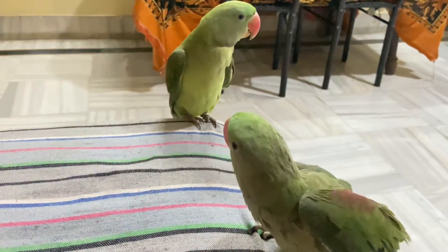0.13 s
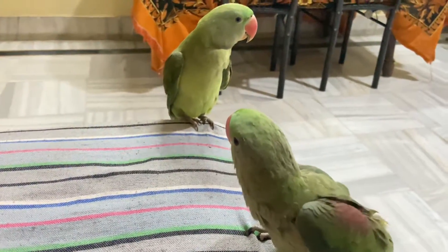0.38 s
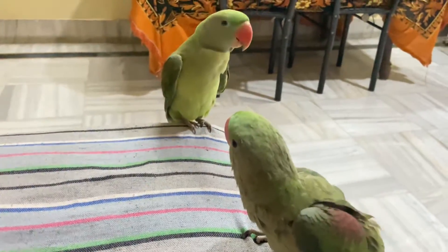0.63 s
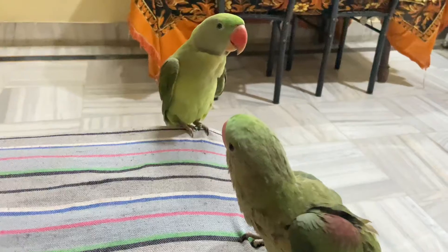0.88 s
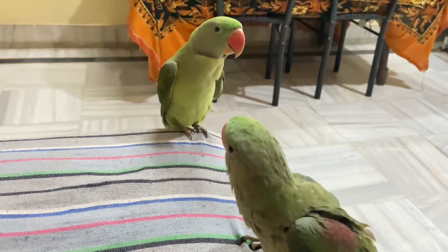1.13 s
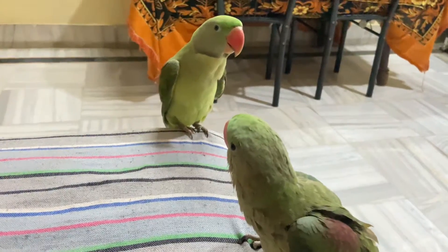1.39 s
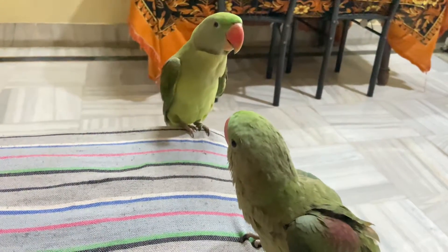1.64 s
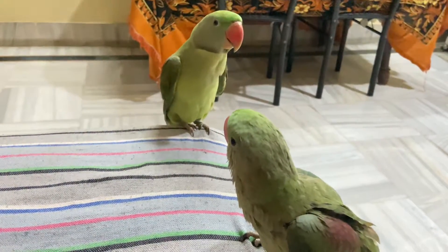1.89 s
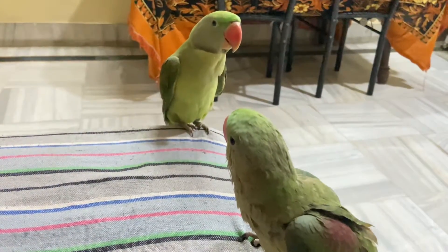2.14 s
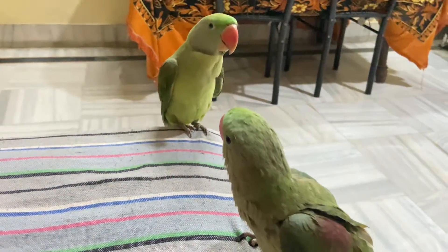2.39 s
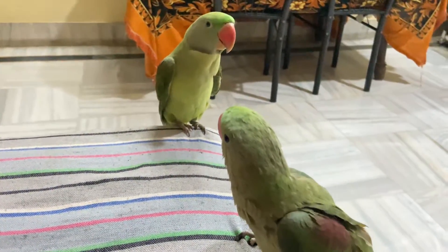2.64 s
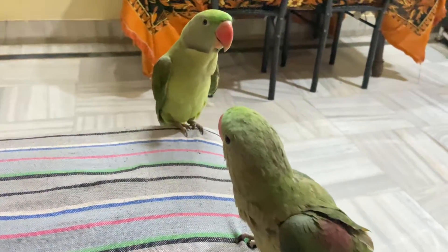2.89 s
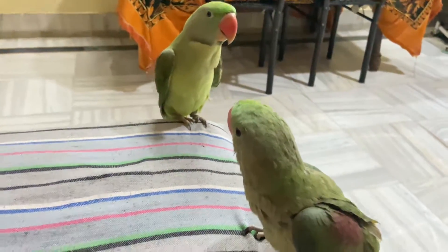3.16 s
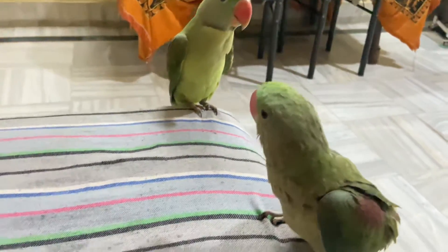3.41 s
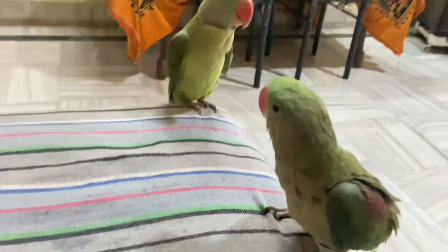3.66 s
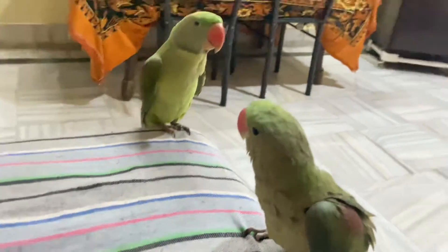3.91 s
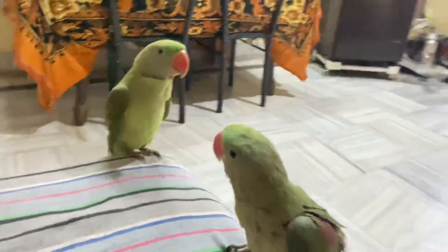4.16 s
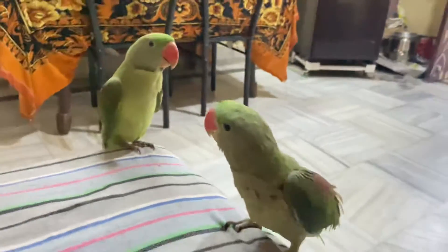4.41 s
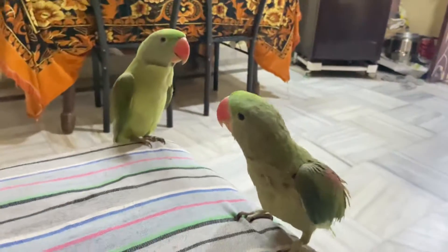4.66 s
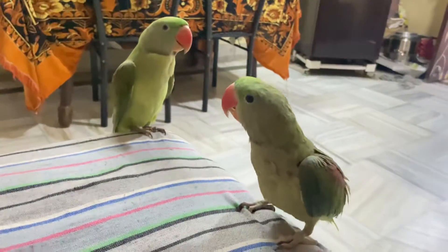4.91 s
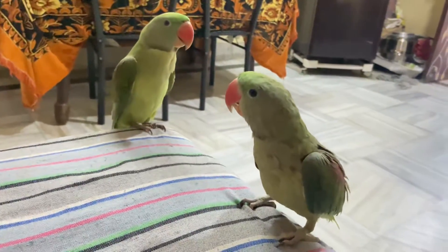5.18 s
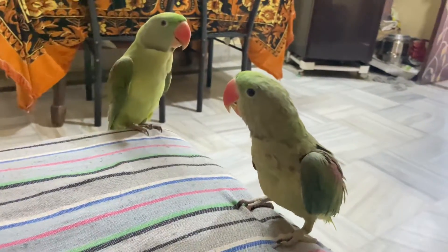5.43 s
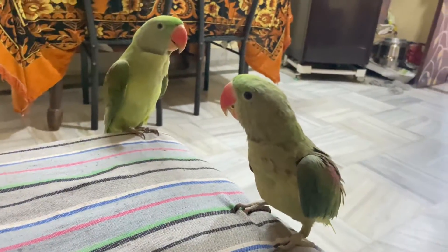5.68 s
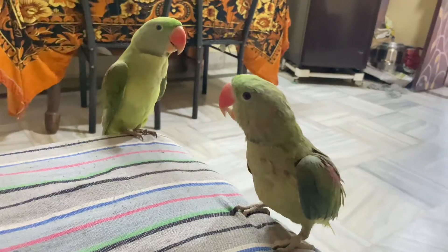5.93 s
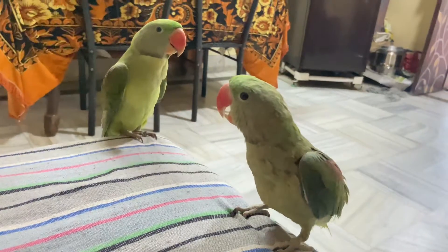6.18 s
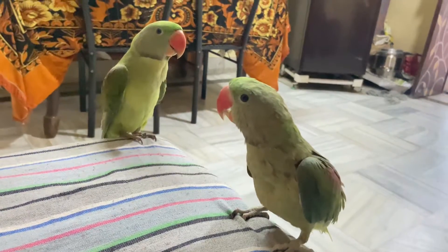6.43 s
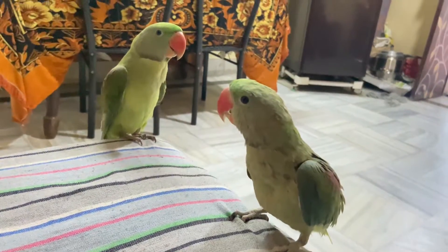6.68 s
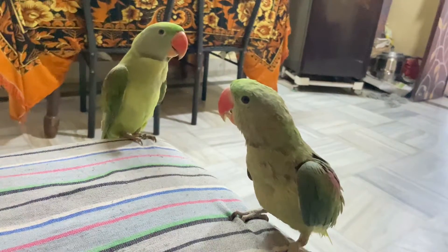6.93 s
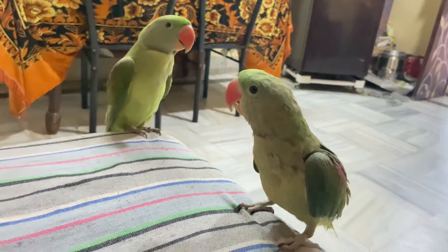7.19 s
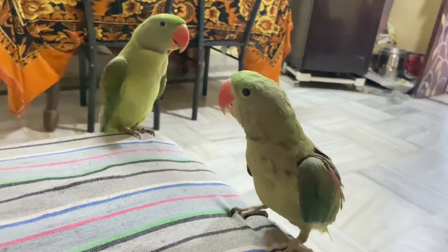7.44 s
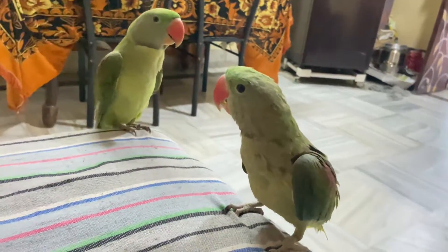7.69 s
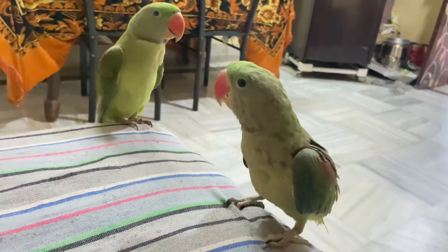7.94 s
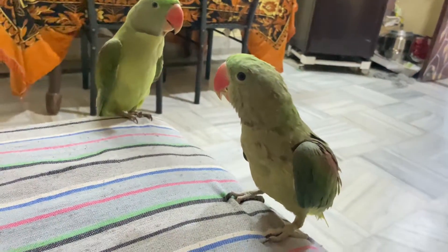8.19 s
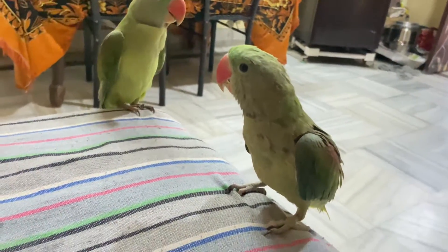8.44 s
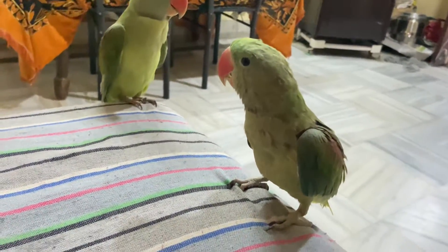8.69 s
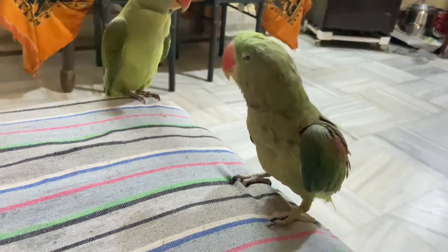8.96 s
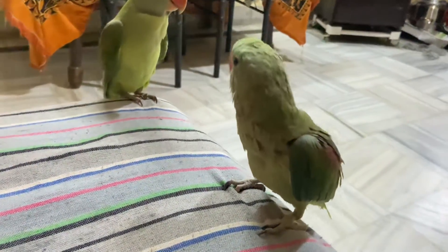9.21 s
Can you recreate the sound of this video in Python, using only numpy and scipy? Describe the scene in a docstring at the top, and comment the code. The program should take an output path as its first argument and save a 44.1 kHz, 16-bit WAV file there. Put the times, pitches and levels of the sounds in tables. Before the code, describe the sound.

In a hard-floored room, a handheld microphone picks up low buffeting air and soft hiss. Faint high cheeps, thin whistles and hoarse squawks come from birds farther off. Just after two seconds a near parakeet gives three quick bright nasal calls, then two louder ones past four seconds, and a short broken cluster near six. Afterwards only weak peeps and whistles remain over the rumble and a faint distant engine drone.

```python
"""Parakeets in a hard-floored room

Two parakeets call near a handheld recorder: syrinx partials and breath filtered by the throat, plus room.
Farther birds cheep, peep, whistle (gliding tones) and squawk (gliding tones, jittered pulses, breath).
Fan air puffs on the microphone ports (short pushes, low noise); the room hisses; a distant engine drones
in spells (two orders of its turn rate); the recorder body is tapped once. Gain control ducks loud calls.
"""
import sys
import numpy as np
from scipy import signal
from scipy.fft import rfft, irfft
from scipy.io import wavfile
from scipy.ndimage import uniform_filter1d, minimum_filter1d

SR = 44100
rng = np.random.default_rng(int(sys.argv[2]) if len(sys.argv) > 2 else 0)


def ratio_of_db(decibels):
    """Turn decibels (scalar or array-like) into linear amplitude factors; 0 dB maps to 1."""
    return 10 ** (np.asarray(decibels, float) / 20)


def transcribe(u):
    """Save the signal u as a 16-bit wav file named by the first command-line argument.

    u: samples, shape (n,) or (channels, n), limited to [-1, 1]; the rate is SR.
    q: integer samples, one column per channel.
    """
    v = np.clip(np.atleast_2d(u).T, -1, 1)
    q = np.round(v * 32767).astype(np.int16)
    wavfile.write(sys.argv[1], SR, q)


N = 411453

# background air: time_s, room_hiss_db, steady_wind_db
AIR = [(0, -41, -48.5), (.6, -43.5, -37), (1.5, -42, -45), (2.2, -42, -40.5), (2.75, -41.5, -37),
       (3.4, -40.5, -38.5), (3.7, -43.5, -33.5), (4.3, -42, -37.5), (4.9, -43.5, -32), (5.4, -47, -35),
       (6.2, -44.5, -34.5), (6.55, -48.5, -38), (7.05, -48.5, -44.5), (7.4, -50.5, -38), (8, -47.5, -46),
       (8.7, -50, -40.5), (9.33, -49.5, -43)]
# room hiss colour: hz, relative_density_db
HISS_COLOUR = [(71, -17), (120, -7.5), (325, -6), (503, -13), (1210, -12.5), (2290, -22), (3080, -22.5),
               (6440, -31.5), (8180, -43.5), (11500, -44.5), (12700, -103), (14000, -106.5)]
# background likeness of left and right: hz, likeness (0-1)
AIR_LIKENESS = [(60, 0.61), (180, 0.79), (550, 0.25), (1650, 0.061), (4970, 0.02), (15000, 0.1)]
# port turbulence colour: hz, relative_density_db
WIND_COLOUR = [(13, -35), (22, -8), (43, 2.5), (64, -0.5), (119, -5.5), (214, -11), (274, -22.5),
               (320, -17), (420, -30), (700, -120)]
# fan gusts on the ports: start_s, push_peak_db, push_hz, left_minus_right_db, turbulence_db
GUSTS = [(0, -47, 60.4, 3, -34), (.428, -27, 107, 7, -40), (.524, -27, 67.3, 8, -37),
         (.66, -26.5, 70, 8, -50), (.805, -36, 71, 5, -57), (1.008, -38, 63.3, 5, -64),
         (1.273, -25, 132.6, 9, -36), (1.566, -33, 97.6, 12, -32), (1.781, -30, 85.3, 7, -39),
         (2.098, -46, 51, 4, -27.5), (2.432, -24, 60.3, 6, -44), (2.677, -29, 54.7, 9, -32),
         (3.408, -24.5, 90.2, 12, -33), (3.837, -27.5, 99.3, 18, -47.5), (4.008, -23, 61.9, 8, -28),
         (4.304, -29.5, 100.5, 5, -40), (4.767, -26, 53, 2, -55), (4.907, -26, 81.6, 8.5, -31),
         (5.029, -37, 113, 3, -32), (5.322, -50, 70, 1, -35), (6.282, -25.5, 42.6, 0, -39.5),
         (7.331, -42, 120, -3, -36), (7.712, -40, 52.3, 5, -41), (8.882, -33.5, 61.9, 8, -53),
         (9.12, -51, 59.2, 0.5, -44)]
# hoarse part of far squawks: start_s, hold_s, level_db
RASPS = [(0.223, 0.055, -51.5), (.325, 0.14, -47), (0.842, 0.26, -51.5), (1.566, 0.16, -47.5),
         (2.926, 0.2, -47), (3.37, 0.29, -53), (3.749, 0.15, -50.5), (5.185, 0.033, -45),
         (5.739, 0.26, -45), (6.68, 0.22, -56.5), (7.801, 0.063, -53.5), (7.946, 0.054, -54)]
# far squawk colour: hz, relative_density_db
RASP_COLOUR = [(1060, -83), (1800, -11), (2440, -2), (2660, -0.5), (3820, -0.5), (5500, -5), (6540, -11),
               (10700, -14.5), (13000, -29.5)]
# voiced notes of far squawks: start_s, level_db, start_hz, end_hz, length_s
SQUAWK_NOTES = [(0.31, -42, 2940, 3120, 0.065), (0.405, -44, 3980, 4030, 0.12),
                (0.448, -38.5, 3196, 3670, 0.074), (0.827, -37, 3080, 3320, .11),
                (0.85, -43, 4260, 4060, 0.057), (0.895, -39.5, 3800, 3190, 0.11),
                (1.591, -40.5, 6140, 6400, .037), (1.601, -45, 3670, 3540, 0.21),
                (1.661, -49, 4290, 3490, 0.15), (1.694, -48, 3540, 2880, 0.082),
                (2.946, -35.5, 3360, 3470, 0.084), (2.947, -38, 4494, 4550, 0.093),
                (2.998, -40, 3800, 3620, 0.13), (3.782, -55, 4550, 4550, 0.083),
                (3.853, -47, 2980, 2890, 0.077), (3.868, -43, 3760, 3980, 0.072),
                (5.137, -46.5, 5390, 4860, .06), (5.237, -45.5, 4400, 4380, 0.076),
                (5.733, -44, 3920, 4160, 0.089), (5.757, -38.5, 3200, 3300, 0.11),
                (5.829, -42, 2500, 2450, 0.15), (6.691, -49, 3150, 3135, 0.13),
                (6.77, -45, 4260, 4270, 0.035), (6.846, -47, 4030, 3860, 0.089),
                (7.843, -43.5, 3810, 3620, 0.07), (7.851, -47, 2660, 3240, 0.036),
                (7.982, -48, 1460, 1275, 0.042)]
# far two-note cheeps: start_s, level_db
CHEEPS = [(.6, -42.5), (1.328, -40.5), (1.968, -39), (3.09, -38.5), (4.138, -42), (4.68, -40),
          (8.233, -48.5)]
# notes of each cheep: delay_s, added_db, start_hz, end_hz, length_s
CHEEP_NOTES = [(0, -3.5, 6000, 5360, 0.058), (.044, 0.7, 6250, 5320, .088)]
# far falling peeps: start_s, level_db, start_hz
PEEPS = [(2.912, -46, 5670), (3.589, -42.5, 6020), (3.66, -42, 5130), (4.735, -36, 5470),
         (5.009, -46, 5710), (6.566, -51, 5750), (7.634, -55, 5420), (8.852, -56, 5480), (8.997, -56, 5340)]
# far nearly level whistles: start_s, level_db, start_hz
WHISTLES = [(1.438, -47, 3233), (3.409, -46.5, 3124), (4.081, -50.5, 3270), (5.51, -54.5, 3120),
            (6.397, -59.5, 3110), (7.712, -50, 3070), (8.339, -53.5, 3140), (8.547, -55, 3140),
            (8.661, -60.5, 3690), (9.224, -54, 3120)]
# near calls, one contour each: time_s, pitch_hz, level_db
NEAR_CALLS = [
    [(2.078, 936, -41), (2.105, 903, -27.5), (2.122, 1057, -23), (2.14, 1087, -14), (2.165, 1082, -12.5),
     (2.19, 1010, -21), (2.215, 840, -33)],
    [(2.282, 805, -29), (2.312, 916, -20), (2.344, 969, -21), (2.368, 945, -29), (2.41, 944, -38)],
    [(2.412, 1080, -34), (2.436, 1140, -11.5), (2.45, 1223, -6.5), (2.478, 1138, -8.5), (2.505, 1051, -10),
     (2.528, 1035, -16), (2.545, 833, -24)],
    [(4.312, 1006, -43), (4.322, 1054, -9.5), (4.345, 1264, -4), (4.362, 1244, -9.5), (4.385, 1150, -4.5),
     (4.412, 1010, -10.5), (4.44, 850, -25.5)],
    [(4.478, 759, -26), (4.505, 863, -28), (4.525, 985, -16), (4.56, 999, -13), (4.575, 1028, -12),
     (4.594, 1043, -12), (4.606, 950, -27), (4.618, 820, -31)],
    [(5.948, 545, -38), (5.955, 620, -24), (5.961, 663, -23.5), (5.964, 700, -51)],
    [(5.997, 944, -20), (6.004, 907.5, -5.5), (6.04, 898, -9.5), (6.072, 891, -16), (6.086, 834, -12),
     (6.1, 903, -28), (6.112, 900, -36)],
    [(6.1, 952, -36), (6.115, 1042, -27), (6.15, 946, -34), (6.18, 1012, -33), (6.215, 960, -36),
     (6.235, 844, -33.5), (6.255, 706, -37)],
]
# voice of each near call: left_lead_ms, roughness (0-1), breath_db, onset_burst_db
VOICING = [(0.402, 0.16, -25, -41), (0.12, 0.16, -13, -42), (0.099, 0.24, -23.5, -30),
           (0.11, 0.05, -30, -19), (0.38, 0.32, -31, -39), (0.095, 0.67, -8.5, -40), (0.425, 0, -17.5, 1.5),
           (0.31, 0.28, -16, -40)]
# throat resonance: hz, relative_gain_db
THROAT = [(450, -43.5), (700, -14), (950, -14.5), (1200, -26), (1750, -16), (2100, -1.5), (2450, -7.5),
          (2800, -0.5), (3240, -10.5), (4440, -6.5), (6740, -11.5), (8240, -29.5), (9650, -35),
          (15500, -23)]
# throat shape of each near call: added_db for partials 1 to 7
PARTIAL_SHAPES = [(14, 9.4, -2.5, 3.5, -9, 2.5, -2.5), (12, 15, 9, 4, -17, -4, -5.5),
                  (9.5, 7.1, 1, 0.5, 1.5, 4, -12), (3.5, 8, -1, -3, -3, 0.5, -5.5),
                  (-3, 4.2, -10.5, -4.5, -8, 1, -2.5), (12.5, 2.8, -8, 3, -6, -18, -9),
                  (1, 3.4, 8.5, 9, -14, 1.5, 3), (6.5, 9.5, -3, 3.5, -1, -2, -14)]
# head in each near call: start_left_minus_right_db, end_left_minus_right_db, start_beak_db, end_beak_db
HEAD_MOVES = [(6, -3, 3.5, 0), (4, -6.5, 0, 3), (1.5, -7, -14, 9.5), (-4, -4.5, -3, 3.5),
              (-0.5, 0.5, -19, -9.5), (9, -5.5, -15.5, 6), (-0.5, -9.5, 0, 2.5), (-1, -5, 4, -1)]
# stone floor bounce, rows left and right: delay_s, level_db
FLOOR_ECHO = [(.0021, -9.5), (.0026, -10)]
# room decay: hz, t60_s
ROOM_T60 = [(500, 0.53), (2500, 0.49), (6000, 0.58), (12000, 0.18)]
# taps on the recorder body: start_s, level_db, mode_hz, t60_s
KNOCKS = [(4.049, -8.5, 534, 0.013)]
# engine spells: start_s, length_s, turn_hz, third_order_db, fourth_order_start_db
ENGINE_SPELLS = [(5.3, 1.49, 45.1, -39, -42), (7.05, 0.66, 43.16, -42, -40), (8.05, 0.79, 41.83, -62, -41)]


def rms_one(x):
    """Scale to unit rms."""
    return x / np.sqrt(np.mean(x ** 2) + 1e-20)


def in_time(rows, t=None):
    """Table columns joined by straight lines in time."""
    s, *columns = np.transpose(rows)
    t = np.arange(N) / SR if t is None else t
    return [np.interp(t, s, c) for c in columns]


def at_hz(points, hz):
    """Spectrum table read on a log-frequency axis."""
    points = np.array(points)
    return np.interp(np.log(hz), np.log(points[:, 0]), points[:, 1])


def drift(rate_hz, size=N):
    """Random wander: white noise through two equal one-pole lowpasses, unit rms."""
    r = np.exp(-2 * np.pi * rate_hz / SR)
    noise = rng.standard_normal(size + 4000)
    return rms_one(signal.lfilter([1], [1, -2 * r, r * r], noise)[4000:])


def span(rows):
    """Sample slice, times and soft edges of a table's stretch of time."""
    a, b = round(rows[0][0] * SR), min(N, round(rows[-1][0] * SR))
    i = np.arange(b - a)
    edge = np.minimum(1, np.minimum(i, i[::-1]) / (0.0022 * SR))
    return slice(a, b), (a + i) / SR, edge


def coloured(spectrum, alike_table, patchy_db):
    """Stereo noise of given colour and likeness, level flickering; unit rms."""
    hz = np.maximum(np.fft.rfftfreq(N, 1 / SR), 1)
    inside = (hz > spectrum[0][0]) & (hz < spectrum[-1][0])
    alike = np.clip(at_hz(alike_table, hz), 0, 1)
    mid, side = rfft(rng.standard_normal((2, N))) * ratio_of_db(at_hz(spectrum, hz)) * inside
    pair = irfft(np.sqrt(1 + alike) * mid + np.sqrt(1 - alike) * side * [[1], [-1]], N)
    return rms_one(pair * ratio_of_db(patchy_db * drift(12.4)))


def room(x, t60_scale):
    """Reverberation: a noise tail per ear, dying band by band."""
    t, tail = np.arange(SR) / SR, 0
    edges_hz = np.geomspace(300, 16000, num=8)
    for low, high in zip(edges_hz, edges_hz[1:]):
        sos = signal.butter(2, [low, high], "band", fs=SR, output="sos")
        band = signal.sosfilt(sos, rng.standard_normal((2, SR)))
        t60_s = t60_scale * at_hz(ROOM_T60, np.sqrt(low * high))
        tail = tail + band * ratio_of_db(-60 * t / t60_s)
    tail = tail * np.minimum(1, t / .015)     # reflections build up
    tail = tail / np.sqrt(np.sum(tail ** 2) / 2)
    return signal.fftconvolve(x[None], tail, axes=1)[:, :N]


def room_hiss(level_db):
    """Room air as coloured noise, its level flickering."""
    return ratio_of_db(level_db) * coloured(HISS_COLOUR, AIR_LIKENESS, patchy_db=1.63)


def wind(steady_db):
    """Low turbulence on the ports: steady air, swelling round each gust."""
    peak_delay_s, rise_s, fall_s = 0.019, 0.015, 0.034
    t = np.arange(0, N, 100) / SR
    s, *_, gust_db = np.transpose(GUSTS)[:, :, None]
    late_s = t - s - peak_delay_s
    shape = np.exp(np.minimum(late_s / rise_s, -late_s / fall_s))
    swell = np.sum(ratio_of_db(gust_db) * shape, axis=0)
    gain = ratio_of_db(steady_db) + np.interp(np.arange(N) / SR, t, swell)
    return gain * coloured(WIND_COLOUR, AIR_LIKENESS, patchy_db=2.5)


def puffs():
    """Each gust pushes the ports for about one and a half cycles."""
    out = np.zeros((2, N + SR))
    for s, peak_db, hz, pan_db, _ in GUSTS:
        cycles = np.arange(round(2.4 * SR / hz)) * hz / SR - 1.2
        push = np.cos(2 * np.pi * cycles) * np.exp(-(cycles / 0.95) ** 2)
        at = round(s * SR)
        out[:, at:at + len(push)] += ratio_of_db(peak_db + pan_db * np.array([[.5], [-.5]])) * push
    return out[:, :N]


def far_rasp():
    """Hoarse voice: wandering jittered pulses, coloured and smeared by a short tail, plus breath."""
    attack_s, release_s, mean_pulse_hz = 0.0099, 0.055, 620
    gate = np.zeros(N)
    for s, hold_s, level_db in RASPS:
        t = np.arange(round((hold_s + 8 * release_s) * SR)) / SR
        release = np.exp(-np.maximum(t - hold_s, 0) / release_s)
        at = round(s * SR)
        gate[at:at + len(t)] += ratio_of_db(level_db) * np.minimum(1, t / attack_s) * release
    turns = np.cumsum(mean_pulse_hz * (1 + .07 * drift(7) + .012 * drift(200))) / SR
    pulses = np.diff(np.floor(turns), prepend=0) * (1 + .3 * drift(400))
    hz = np.maximum(np.fft.rfftfreq(N, 1 / SR), 1)
    voiced = rms_one(irfft(rfft(pulses) * ratio_of_db(at_hz(RASP_COLOUR, hz)), N))
    breath = coloured(RASP_COLOUR, [(1000, 0.35), (9000, 0.6)], patchy_db=3.0)
    return room(voiced * gate, .45) + ratio_of_db(-5) * breath * gate


def far_birds():
    """Gliding warbled notes with overtones, the direct sound under a room tail."""
    cheep_over_db, peep_over_db, whistle_over_db, squawk_over_db = -38, -21.5, -16.5, -14   # per overtone
    peep_fall, peep_s = 0.0432, 0.028           # share of the pitch, length
    whistle_rise, whistle_s = 0.0133, .12       # share of the pitch, length
    notes = []
    for s, db in CHEEPS:
        for lag_s, step_db, hz0, hz1, length_s in CHEEP_NOTES:
            notes.append((s + lag_s, db + step_db, hz0, hz1, length_s, cheep_over_db))
    notes += [(s, db, hz, hz * (1 - peep_fall), peep_s, peep_over_db) for s, db, hz in PEEPS]
    notes += [(s, db, hz, hz * (1 + whistle_rise), whistle_s, whistle_over_db) for s, db, hz in WHISTLES]
    notes += [(*row, squawk_over_db) for row in SQUAWK_NOTES]
    mono = np.zeros(N + SR)
    for s, level_db, hz0, hz1, length_s, over_db in notes:
        u = np.arange(round(length_s * SR)) / (length_s * SR)
        warble = .016 + .04 * ratio_of_db(over_db)     # notes rich in overtones shake more
        glide = np.sin(np.pi / 2 * np.clip(1.8 * u - .25, 0, 1)) ** 2     # dwells at both ends
        pitch_hz = (hz0 + (hz1 - hz0) * glide) * (1 + warble * drift(110.5, size=len(u)))
        turns = np.cumsum(pitch_hz) / SR
        wave = 0
        for k in range(4):
            audible = (k + 1) * hz0 < 14000
            wave = wave + ratio_of_db(over_db * k) * np.sin(2 * np.pi * (k + 1) * turns) * audible
        at = round(s * SR)
        mono[at:at + len(u)] += ratio_of_db(level_db) * wave * np.minimum(1, u / 0.1) * (1 - u ** 3)
    return ratio_of_db(-5) * mono[:N] + room(mono[:N], t60_scale=0.94)


def near_calls():
    """Syrinx partials and breath through the throat; the left port leads; floor bounce and room."""
    room_db = -8.5
    direct, mono = np.zeros((2, N)), np.zeros(N)
    hiss = coloured(THROAT, [(1000, 0.31), (9000, 0.2)], patchy_db=-0.5)
    k = np.arange(1, 17)[:, None]
    calls = zip(NEAR_CALLS, VOICING, PARTIAL_SHAPES, HEAD_MOVES)
    for rows, (lead_ms, rough, breath_db, burst_db), shape, head in calls:
        at, t, edge = span(rows)
        pitch_hz, level_db = in_time(rows, t)
        pan_db, beak_db = np.linspace(head[::2], head[1::2], len(t)).T     # head and beak move evenly
        pitch_hz = uniform_filter1d(pitch_hz, round(0.018 * SR), mode="nearest")  # muscles round the glide
        turns = np.cumsum(pitch_hz * (1 + .004 * drift(150, size=len(t)))) / SR
        hz = k * pitch_hz
        shape_db = np.pad(shape, (0, len(k) - len(shape)), mode="edge")[:, None]
        upper = np.clip(hz / 3000 - 1, 0, 1)     # the beak acts from 3 kHz, fully from 6 kHz
        gain = ratio_of_db(at_hz(THROAT, hz) + shape_db + beak_db * upper) * (hz < 15800) + 1e-9
        gain = gain / np.sqrt(np.sum(gain ** 2, axis=0) / 2)
        flutter = rough * np.sqrt(k)     # upper partials break up more
        wobble = 1 + flutter * np.array([drift(58, size=len(t)) for _ in k])
        start = rng.random(k.shape)
        air = ratio_of_db(breath_db) + ratio_of_db(burst_db) * np.exp(-(t - t[0]) / 0.0045)     # valve opens with a puff
        for ear, side in enumerate((.5, -.5)):
            phase = 2 * np.pi * (k * turns + start + hz * side * lead_ms / 1000)
            wave = np.sum(gain * wobble * np.sin(phase), axis=0)
            wave = wave + air * hiss[ear, at]
            direct[ear, at] += wave * edge * ratio_of_db(level_db + side * pan_db)
        mono[at] += wave * edge * ratio_of_db(level_db)     # right-port wave, unpanned, feeds the room
    for ear, (delay_s, echo_db) in enumerate(FLOOR_ECHO):
        i = np.arange(N)
        direct[ear] += ratio_of_db(echo_db) * np.interp(i - delay_s * SR, i, direct[ear])
    return direct + ratio_of_db(room_db) * room(mono, 1)


def knock():
    """One short dull mode of the recorder body."""
    out = np.zeros(N)
    for s, level_db, hz, t60_s in KNOCKS:
        t = np.maximum(np.arange(N) / SR - s, 0)
        decay = ratio_of_db(level_db - 60 * t / t60_s)
        out += decay * np.sin(2 * np.pi * hz * t) * np.minimum(1, t / .003)
    return out


def engine():
    """Third and fourth orders of a far engine pass the walls; the fourth fades through each spell."""
    swell_s, fourth_fade_db_per_s = 0.21, 14.5
    out = np.zeros(N)
    for s, length_s, turn_hz, third_db, fourth_db in ENGINE_SPELLS:
        t = np.arange(round(length_s * SR)) / SR
        turn = 2 * np.pi * np.cumsum(turn_hz * (1 + .008 * drift(2.5, size=len(t)))) / SR
        swell = np.sqrt(2) * np.minimum(1, np.minimum(t, length_s - t) / swell_s)
        third = ratio_of_db(third_db) * np.sin(3 * turn)
        fourth = ratio_of_db(fourth_db - fourth_fade_db_per_s * t) * np.sin(4 * turn)
        at = round(s * SR)
        out[at:at + len(t)] = swell * (third + fourth)
    return out


def scene():
    """Birds near and far over the room's air."""
    hiss_db, wind_db = in_time(AIR)
    air = room_hiss(hiss_db) + wind(wind_db) + puffs()
    birds = far_rasp() + far_birds() + near_calls()
    return air + birds + knock() + engine()


def low_pass(x):
    """Removes everything above the highest recorded frequency."""
    return signal.sosfilt(signal.butter(12, 16480, fs=SR, output="sos"), x)


def record(dry):
    """Microphone bass cut; gain control turns down on loud sound, holds, lets go; soft overload."""
    hold_s, settle_s, knee_db, cut_share, ceiling = .16, .03, -24, .55, 1.1
    dry = signal.sosfilt(signal.butter(4, 38, "high", fs=SR, output="sos"), dry)
    power = signal.lfilter([.002], [1, -.998], np.mean(dry ** 2, axis=0))
    level_db = 10 * np.log10(power + 1e-12)
    hold = round(hold_s * SR) // 2 * 2 + 1
    held_db = -minimum_filter1d(-level_db, hold, origin=hold // 2)     # loudest over the past hold
    cut_db = cut_share * np.maximum(held_db - knee_db, 0)
    r = np.exp(-1 / (settle_s * SR))
    gain = ratio_of_db(-signal.lfilter([1 - r], [1, -r], cut_db))
    mix = ceiling * np.tanh(dry * gain / ceiling)
    return low_pass(mix)


dry = scene()
out = record(dry)
transcribe(out)
```